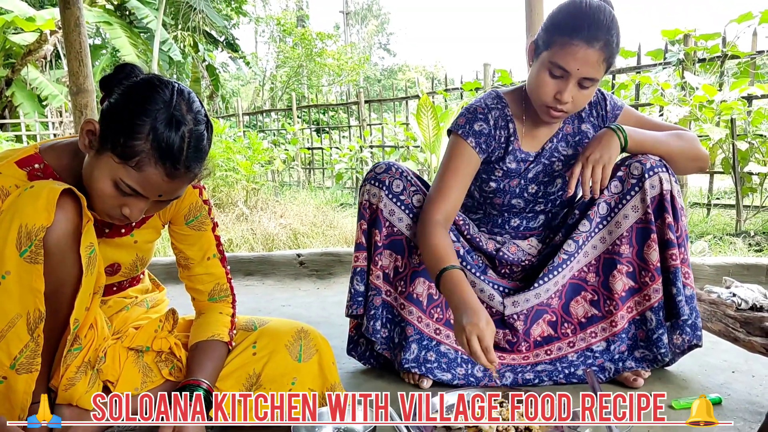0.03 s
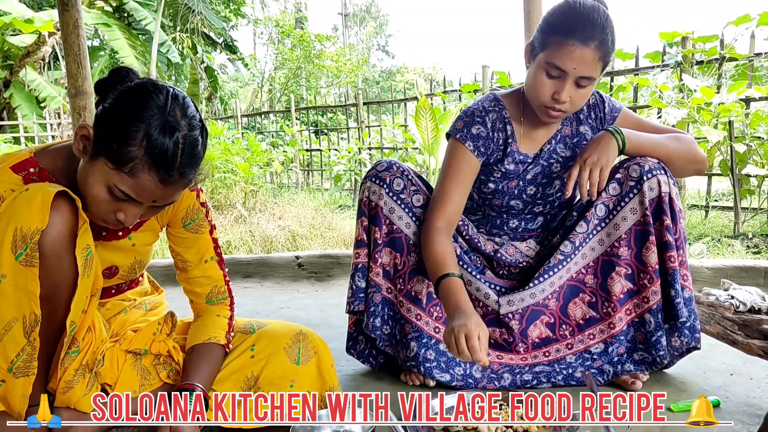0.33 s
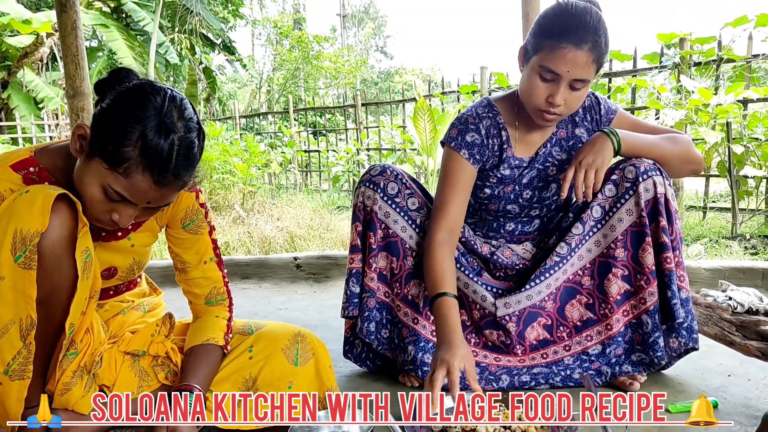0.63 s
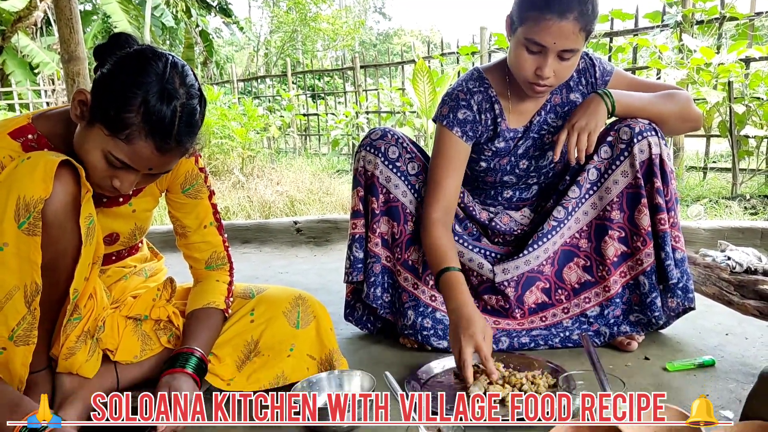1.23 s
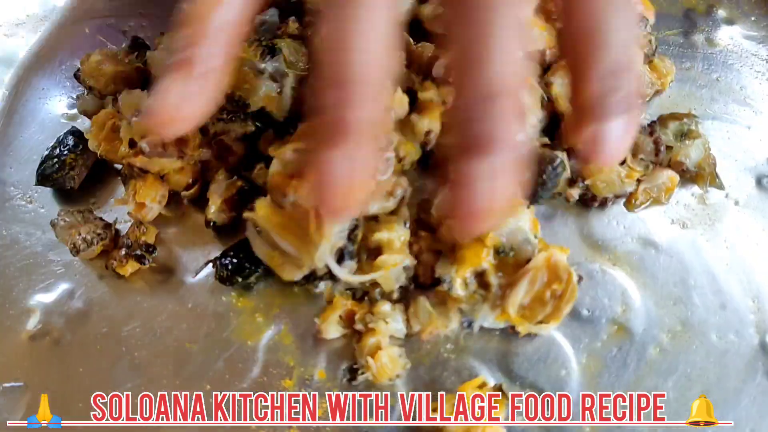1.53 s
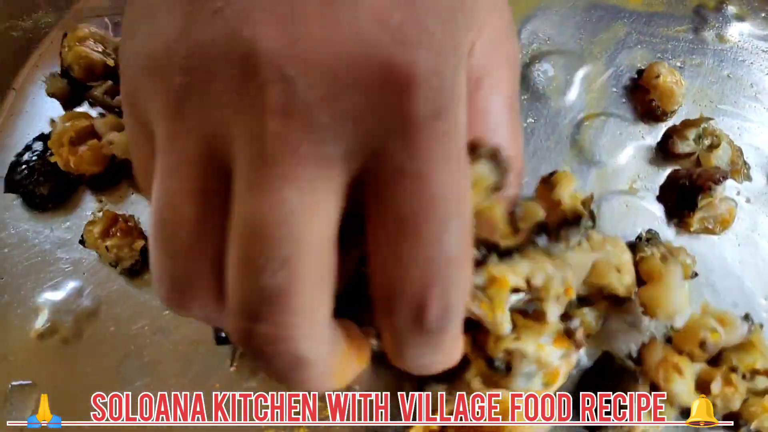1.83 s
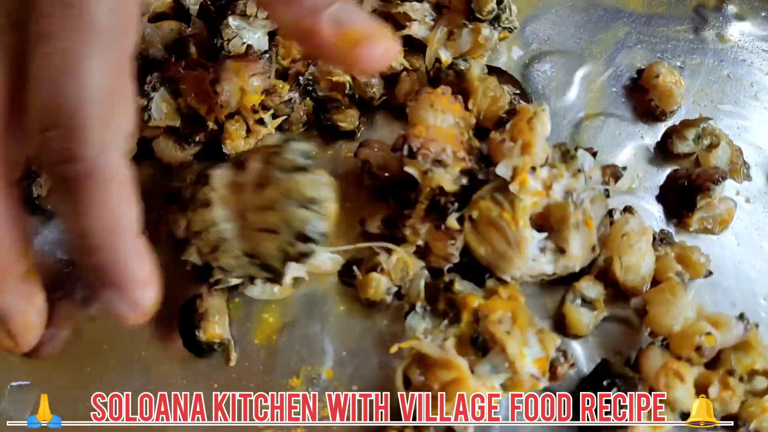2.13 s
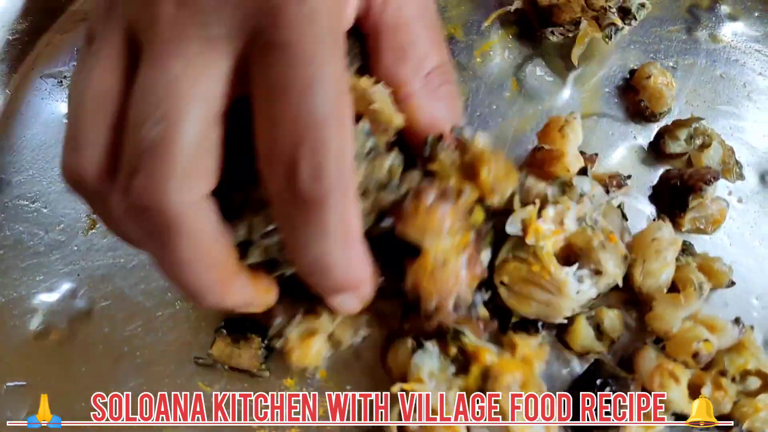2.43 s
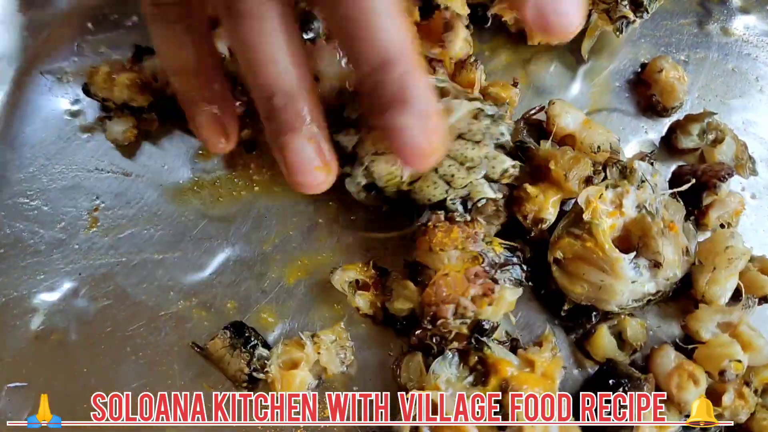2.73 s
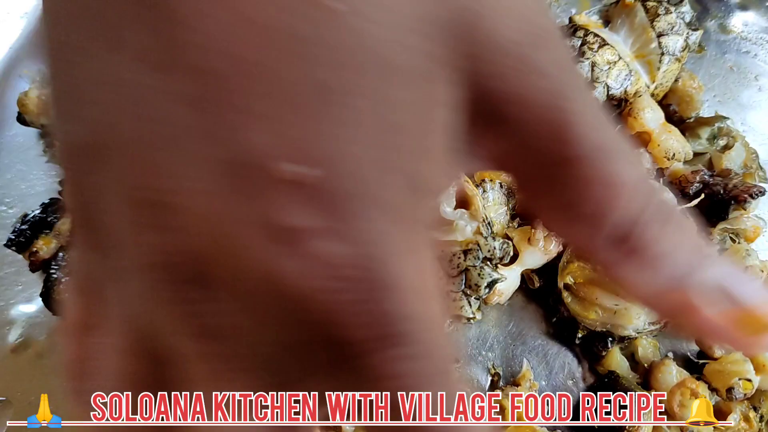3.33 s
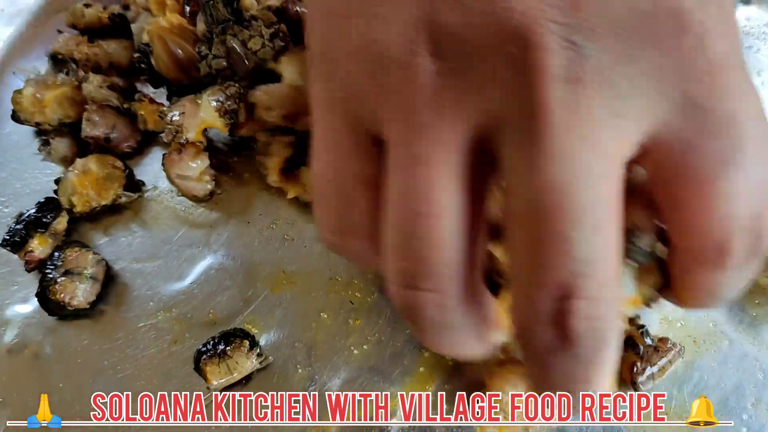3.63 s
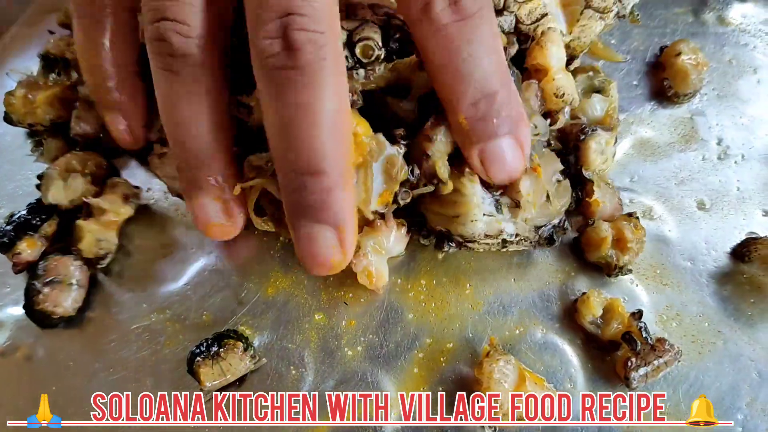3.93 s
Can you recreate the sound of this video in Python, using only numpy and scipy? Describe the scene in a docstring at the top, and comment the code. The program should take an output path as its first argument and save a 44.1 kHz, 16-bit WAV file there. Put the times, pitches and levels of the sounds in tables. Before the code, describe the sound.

Shell pieces scrape, rustle and knock on a steel plate as a hand turns them.

```python
"""A hand sweeps and turns spiced crab pieces on a steel plate, close by, in a quiet yard.
First a small bird chirps far away and a thin hiss swells and fades, while faint strokes begin: stick-slip
friction of shell on metal, exciting the plate's drifting modes. From about 1.4 s the strokes grow loud;
pieces snap, rasp, screech and knock, hardest at 2.4 s. Then bangles on the wrist collide most often,
ringing in their high modes, and the sweeping goes on to a last sharp knock at 3.9 s."""
import sys
import numpy as np
from scipy import signal
from scipy.fft import rfft, irfft
from scipy.io import wavfile
from scipy.ndimage import uniform_filter1d

SR = 44100
rng = np.random.default_rng(int(sys.argv[2]) if len(sys.argv) > 2 else 0)


def int16_out(signal):
    """Quantize to a 16-bit WAV file."""
    q = np.round(np.clip(np.atleast_2d(signal).T, -1, 1) * 32767)
    wavfile.write(sys.argv[1], SR, q.astype(np.int16))


N = 176400

# strokes of the hand: t/s, rubbing level/dB, rustle level/dB
STROKE_LEVELS = [(0.0, -66, -58.5), (0.114, -68, -63), (0.389, -69, -57), (0.682, -77, -55),
                 (0.748, -67, -45), (0.814, -82, -54.5), (0.83, -72, -51), (0.956, -52.5, -44),
                 (1.07, -59, -52.5), (1.088, -57, -42.5), (1.153, -45, -40.5), (1.189, -53, -44.5),
                 (1.303, -65, -52.5), (1.357, -57.5, -52.5), (1.411, -42.5, -42.5), (1.472, -66, -48),
                 (1.488, -48, -40), (1.514, -36, -32.5), (1.648, -43, -37.5), (1.69, -36.5, -33),
                 (1.768, -33.5, -31.5), (1.816, -36, -33.5), (1.879, -33, -28.5), (2.025, -41, -43),
                 (2.085, -45.5, -46), (2.132, -39.5, -54), (2.175, -63, -56), (2.205, -53, -54),
                 (2.217, -62, -53), (2.249, -35, -35), (2.278, -39.5, -25), (2.295, -29.5, -23),
                 (2.355, -32.5, -33.5), (2.455, -31, -28.5), (2.546, -39.5, -44), (2.56, -36.5, -37.5),
                 (2.614, -37, -31.5), (2.723, -39.5, -38.5), (2.746, -51, -45.5), (2.818, -47, -36),
                 (2.889, -40.5, -36.5), (2.901, -43.5, -37), (2.923, -32, -28), (2.973, -31.5, -27.5),
                 (3.105, -36.5, -34), (3.171, -38.5, -37.5), (3.213, -45, -49.5), (3.254, -51, -44.5),
                 (3.297, -74, -57), (3.433, -60, -50), (3.471, -45.5, -34.5), (3.537, -32.5, -32.5),
                 (3.593, -43, -38), (3.613, -34.5, -30), (3.632, -36, -31), (3.655, -40, -27.5),
                 (3.677, -44, -33.5), (3.694, -32, -32.5), (3.761, -48, -45), (3.781, -47, -46),
                 (3.817, -42, -49.5), (3.919, -52.5, -43), (3.961, -35.5, -44), (3.985, -46, -49)]
# spectra of shell on steel and of shell on shell: f/Hz, level/dB
RUB_SPECTRUM = [(100, 1.5), (350, -23), (700, -2.5), (930, 9), (1250, -5.5), (1700, -4.5), (2200, -0.5),
                (2900, -4.5), (4200, -3.5), (7000, -20), (15000, -72)]
RUSTLE_SPECTRUM = [(300, -47.5), (2000, -1.5), (3400, -13.5), (5500, -1.5), (7300, 7.5), (8600, 4.5),
                   (10300, -5), (12000, -7), (14200, -9), (16000, -60)]
def rubbing(t):
    """Stick-slip friction: dense slips of shell on steel and on shell merge into noise at each stroke."""
    when, rub_db, rustle_db = np.array(STROKE_LEVELS).T
    grit = slips(per_s=3500, spread_db=1, decay_s=0.00073) * undb(3 * walk(60))
    rub = undb(-7.5) * unit(colour(grit, RUB_SPECTRUM)) + undb(-4.5) * unit(plate(grit))
    fine_slips = slips(per_s=4800, spread_db=6, decay_s=0.0019) + grit * .5
    rustle = unit(colour(shimmer(fine_slips), RUSTLE_SPECTRUM))
    finger_drag = unit(resonate(noise(N), hz=156, t60=0.043))
    crunch = shell_bits(per_s=340, low_hz=1077, high_hz=2696, cycles=6.7, spread_db=4)
    ticks = shell_bits(per_s=640, low_hz=5610, high_hz=12000, cycles=28, spread_db=3.5)
    rub = rub + undb(-19) * finger_drag + undb(-8.5) * crunch
    rustle = rustle + undb(-10) * ticks
    return rub * undb(np.interp(t, when, rub_db)) + rustle * undb(np.interp(t, when, rustle_db))


def slips(per_s, spread_db, decay_s):
    """Shot noise: slips of unequal size come at random times, and their decaying energies add."""
    onsets = rng.random(N) < per_s / SR
    sizes = onsets * undb(spread_db * np.minimum(rng.exponential(size=N), 5))
    energy = signal.lfilter([1], [1, -np.exp(-2 / (decay_s * SR))], sizes ** 2 + 1e-12)
    return unit(np.sqrt(energy) * noise(N))


# modes of the loaded plate: f/Hz, level/dB, T60/s
PLATE_MODES = [(864, -19.5, 0.037), (905.6, 1, 0.065), (974, -1, 0.041), (1316, -3.5, 0.052),
               (1594, 3.5, 0.048), (2047, 2.5, 0.04), (2195, -2.5, 0.075)]
def plate(x, drift=0.033, swell_db=4.5):
    """Forced vibration: moving fingers load the plate, so each mode drifts in frequency and strength."""
    out = 0
    for hz, db, t60 in PLATE_MODES:
        drive = x * undb(db + swell_db * np.clip(walk(30), -2, 2))
        out = out + resonate(drive, hz * (1 + drift * walk(14)), t60)
    return out


def shimmer(x, decay_s=0.0082):
    """High modal density: the plate's countless weak modes give each slip a short noisy tail."""
    t = np.arange(SR // 15) / SR
    tail = noise(len(t)) * np.exp(-t / decay_s)
    tail /= np.sqrt(np.sum(tail ** 2) / 2)
    return x + undb(13) * signal.fftconvolve(x, tail, axes=1)[:, :N]


def shell_bits(per_s, low_hz, high_hz, cycles, spread_db):
    """Damped free vibration: hollow bits of shell collide, each ringing at its natural frequency."""
    out, t = np.zeros((2, N)), np.arange(SR // 40) / SR
    for when, pitch, size, side, turn in rng.random((int(per_s * N / SR), 5)):
        hz = low_hz * (high_hz / low_hz) ** pitch
        gain = undb(-spread_db * np.log(max(size, .015))) * np.sqrt([[side], [1 - side]])
        port_phase = np.array([[0], [(turn - .5) * min(hz / 500, 2 * np.pi)]])
        envelope = np.exp(-t * hz / cycles) * (1 - np.exp(-t * hz))
        add(out, when * N / SR, gain * np.sin(2 * np.pi * hz * t + port_phase) * envelope)
    return unit(out)


# shell points skidding on steel: peak t/s, half-width/s, level/dB
SCREECH_SWELLS = [(1.44, 0.0053, -37), (1.531, 0.015, -25), (1.546, 0.0039, -21.5), (1.568, 0.0086, -19),
                  (1.878, 0.0032, -23), (2.779, 0.012, -31), (2.931, 0.017, -24), (2.977, 0.021, -28),
                  (3.322, 0.0097, -34), (3.658, 0.0063, -30), (3.903, 0.0093, -43)]
# spectrum of a hard contact on steel: f/Hz, level/dB
SCREECH_SPECTRUM = [(500, -28), (4000, -24.5), (6500, 0.5), (8600, 4), (11000, 6), (12800, 1), (14500, -9)]
# high modes of the steel: f/Hz, level/dB, T60/s
STEEL_MODES = [(5700, -12, .04), (7140, 25, 0.057), (9400, 7, 0.021), (8170, -24, .04), (9940, 2, .05),
               (9460, -14, .05), (10130, -19, .05), (10200, -22, 0.034), (10800, -17, .05),
               (11200, -4, .05), (12400, 4, 0.095), (12800, -14, .05), (13620, -9, .05)]
def screeches(t):
    """Frictional excitation: a hard point judders over the metal and rings its high modes."""
    envelope = sum(swell(t, *row) for row in SCREECH_SWELLS)
    judder = envelope * unit(colour(slips(per_s=2200, spread_db=0.5, decay_s=0.00016), SCREECH_SPECTRUM))
    return undb(0.5) * (judder + judder.std() * unit(ring(judder, STEEL_MODES)))


# hard drags of shell: peak t/s, half-width/s, level/dB, f/Hz
RASP_SWELLS = [(1.507, 0.013, -43, 1670), (1.57, 0.013, -39, 5900), (1.8, 0.013, -43, 5300),
               (1.875, .012, -38, 4100), (1.862, 0.019, -37, 1700), (2.33, 0.022, -29.5, 1750),
               (2.3, .025, -37, 5100), (2.9, 0.02, -32.5, 6100), (2.992, 0.025, -37, 6700),
               (2.4, 0.027, -61, 4400), (3.698, 0.017, -31, 1840)]
def rasps(t, q=16):
    """Resonance driven by stick-slip: a dragged shell rings at its own unsteady frequency."""
    out, drag = 0, slips(per_s=1900, spread_db=4.5, decay_s=0.00017)
    wander = 1 + 0.01 * walk(50)
    for at, half, db, hz in RASP_SWELLS:
        ringing = resonate(drag, hz * wander, t60=np.log(1000) * q / (np.pi * hz))
        out = out + swell(t, at, half, db) * unit(ringing)
    return out


# pieces striking the plate: t/s, level/dB, left minus right/dB
KNOCK_IMPACTS = [(1.545, -27.5, 0), (1.621, -28, -4), (1.679, -27, -2), (1.768, -25, -4), (1.872, -25.5, 2),
                 (1.946, -27, -2), (2.029, -25.5, -1), (2.115, -37, 1), (2.3754, -7.5, 1.5),
                 (2.672, -27, 1), (2.991, -26, -1), (3.099, -21.5, 2.5), (3.159, -27.5, -3),
                 (3.232, -25, 2), (3.268, -32.5, -3), (3.446, -31.5, -1), (3.487, -33.5, 2),
                 (3.541, -25.5, -4), (3.61, -27, -2), (3.778, -32, -1), (3.9342, -13.5, 0.5)]
# spectrum of their rattle: f/Hz, level/dB
RATTLE_SPECTRUM = [(60, -72.5), (180, -19), (450, -9.5), (650, -6), (900, 5.5), (1300, -3.5), (2000, -2.5),
                   (3000, -23.5), (6000, -21), (15000, -69)]
def knocks(dent_hz=940, dent_s=0.0045, rattle_s=0.0061):
    """Impulse response: a dropped piece flexes the damped plate, rings its modes and rattles briefly."""
    out, t = np.zeros((2, N)), np.arange(SR // 6) / SR
    impulse = np.array([t == 0, t == 0], float)
    ringing = ring(impulse, PLATE_MODES)
    dent = np.sin(2 * np.pi * dent_hz * t) * np.exp(-t / dent_s)
    blow = undb(-2.5) * dent + undb(-22) * ringing / abs(ringing).max()
    for at, db, pan_db in KNOCK_IMPACTS:
        rattle = unit(colour(noise(len(t)), RATTLE_SPECTRUM)) * np.exp(-t / rattle_s)
        gain = undb(db + np.array([[pan_db], [-pan_db]]) / 2)
        add(out, at, gain * (blow + undb(-5.5) * rattle))
    return out


# shell edges snapping: t/s, level/dB, shell resonance f/Hz
SHELL_SNAPS = [(.737, -34.5, 9000), (1.0815, -24.5, 2360), (1.408, -27, 8400), (1.438, -21.5, 8300),
               (1.496, -26.5, 8900), (2, -34, 8500), (2.029, -31.5, 5000), (2.044, -40, 8450),
               (2.067, -33.5, 10200), (2.117, -28.5, 3500), (2.127, -29.5, 6460), (2.159, -35.5, 8850),
               (2.3768, -19.5, 1880), (2.712, -16.5, 2050), (3.033, -17.5, 9000), (3.099, -10.5, 8870),
               (3.233, -24, 3630), (3.445, -34.5, 9300), (3.796, -32, 9250), (3.875, -25.5, 3930),
               (3.882, -23, 2400), (3.888, -21.5, 4020), (3.9349, -17.5, 12700)]
# spectrum of the crack: f/Hz, level/dB
CRACK_SPECTRUM = [(300, -7.5), (1000, -20.5), (3000, -12), (6000, 8.5), (9000, 10.5), (11500, -3.5),
                  (15000, -4)]
def snaps(rise_s=0.0003, decay_s=0.0024, tail_s=0.012, q=19):
    """Release of elastic energy: thin shell flicks free with a crack coloured by its own resonance."""
    out, t = np.zeros((2, N)), np.arange(SR // 12) / SR
    envelope = (np.exp(-t / decay_s) + undb(-12) * np.exp(-t / tail_s)) * (1 - np.exp(-t / rise_s))
    for at, db, hz in SHELL_SNAPS:
        burst = noise(len(t))
        ringing = resonate(burst, hz, t60=np.log(1000) * q / (np.pi * hz))
        crack = unit(colour(burst, CRACK_SPECTRUM)) + undb(-8) * unit(ringing)
        add(out, at, undb(db - 2.5) * crack * envelope)
    return out


# bangles colliding: t/s, level/dB, favoured f/Hz
BANGLE_CLINKS = [(1.684, -26, 11200), (1.899, -41, 11900), (2.067, -33, 10400), (2.156, -39, 12300),
                 (2.602, -34, 12100), (2.617, -29, 12300), (2.743, -31.5, 11080), (2.77, -22.5, 9400),
                 (2.792, -21.5, 12000), (2.8065, -18, 11340), (2.85, -24, 12200), (2.864, -26.5, 10200),
                 (2.879, -27, 11500), (2.915, -18, 11600), (2.927, -11.5, 12100), (3.061, -32, 12000),
                 (3.071, -20.5, 12100), (3.311, -26, 12800), (3.337, -30, 12000), (3.347, -33, 9400),
                 (3.388, -33, 12000), (3.604, -19, 11830), (3.644, -22, 12200), (3.65, -21, 11650),
                 (3.655, -30, 10800), (3.89, -35, 12200), (3.962, -22.5, 12300), (3.9755, -23.5, 12400)]
# modes of the bangles: f/Hz, level/dB, T60/s
BANGLE_MODES = [(5100, -21, 0.12), (6560, 4, 0.11), (8170, -31, .04), (9400, -3.5, 0.09),
                (10450, -8, 0.059), (10700, -9, 0.077), (11420, -1, 0.1), (12080, 4, 0.073),
                (12110, -8, 0.089), (12870, 4, 0.053), (13300, -31, 0.044)]
def bangles(touches=3, bounce_s=0.014, bounce_db=-13.5, rise_s=0.00082, chatter_s=0.0018):
    """Inelastic rebound: bangles touch ever more weakly, each time with a different mix of modes."""
    out, t = np.zeros((2, N)), np.arange(SR // 6) / SR
    detune, scatter_db, focus_db, focus_width_hz = 0.0052, 3, 16, 450
    envelope = np.exp(-t / chatter_s) * (1 - np.exp(-t / rise_s)) ** 2
    for at, db, favoured_hz in BANGLE_CLINKS:
        for bounce in range(touches):
            touch = rng.standard_normal((2, len(t))) * envelope
            modes = []
            for hz, mode_db, t60 in BANGLE_MODES:
                mode_db += focus_db * np.exp(-((hz - favoured_hz) / focus_width_hz) ** 2)
                modes.append((hz * rng.normal(1, detune), rng.normal(mode_db, scatter_db), t60))
            ringing = ring(touch, modes)
            clink = ringing / abs(ringing).max() + undb(-18) * colour(touch, SCREECH_SPECTRUM)
            add(out, at, undb(db + 3.5 + bounce * bounce_db) * clink)
            at += bounce_s * (.5 + rng.random())
    return out


# heel of the hand on the plate, and at 2.376 s the low thud of the hardest knock: peak t/s, half-width/s,
# level/dB
PRESS_SWELLS = [(1.572, 0.018, -51), (2.108, 0.081, -49), (2.376, 0.0033, -31), (2.947, 0.015, -37)]
# spectrum of the bump: f/Hz, level/dB
PRESS_SPECTRUM = [(40, -6), (130, 4.5), (300, -4), (450, -2.5), (900, -38), (4000, -77)]
def presses(t):
    """Compliant contact: the soft hand bears down, and the hardest knock thuds, mainly in low frequencies."""
    return sum(swell(t, *row) for row in PRESS_SWELLS) * unit(colour(noise(N), PRESS_SPECTRUM))


# spectrum of the yard: f/Hz, level/dB
YARD_SPECTRUM = [(25, -6), (60, 2), (140, -7.5), (280, -16.5), (420, -17.5), (600, -28), (1000, -33),
                 (1700, -42), (2400, -34.5), (3300, -45), (6000, -37), (9000, -40), (14000, -41)]
def yard():
    """Ambient noise: low outdoor rumble and faint hiss, only partly coherent between the ports."""
    air = noise(N) + undb(-7) * rng.standard_normal((2, N))
    return undb(-49 + 0.057 * walk(4.9)) * unit(colour(air, YARD_SPECTRUM))


# chirps: t/s, duration/s, start f/Hz, end f/Hz, level/dB
BIRD_CHIRPS = [(-.01, 0.041, 11300, 11100, -64), (0.056, 0.092, 11060, 10200, -61)]
def bird(t):
    """Frequency modulation: a distant bird's thin tone wavers and glides downward."""
    out, waver = 0, 1 + 0.0046 * walk(195)
    for at, length, start_hz, end_hz, db in BIRD_CHIRPS:
        progress = np.clip((t - at) / length, 0, 1)
        hz = (start_hz + (end_hz - start_hz) * progress ** 2) * waver
        out = out + undb(db) * np.sin(np.pi * progress) * np.sin(2 * np.pi * np.cumsum(hz) / SR)
    return out


# spectrum of the far hiss: f/Hz, level/dB
HISS_SPECTRUM = [(3000, -45), (5200, -10), (5900, 6), (6400, 8), (7200, -17), (11000, -43)]
def far_hiss(t):
    """Narrow-band noise: a soft hiss swells and fades far off."""
    return swell(t, at=0.7, half_s=0.11, db=-53) * unit(colour(noise(N), HISS_SPECTRUM))


def undb(db):
    """Amplitude ratio of a level in decibels."""
    return 10 ** (np.asarray(db) / 20)


def unit(x):
    """Normalisation to rms 1."""
    return x / np.sqrt(np.mean(x ** 2))


def swell(t, at, half_s, db):
    """Gaussian envelope, down to 1/e at half_s either side of its peak."""
    return undb(db) * np.exp(-((t - at) / half_s) ** 2)


def colour(x, points, size=4096):
    """Minimum-phase filter through (f/Hz, level/dB) points, by folding the cepstrum."""
    hz, db = np.array(points, float).T
    log_hz = np.log(np.arange(size // 2 + 1) * SR / size + 1)
    cepstrum = irfft(np.interp(log_hz, np.log(hz), db) * np.log(10) / 20)
    cepstrum[1:size // 2] *= 2
    cepstrum[size // 2 + 1:] = 0
    response = irfft(np.exp(rfft(cepstrum)))
    return signal.fftconvolve(x, response[None], axes=1)[:, :x.shape[1]]


def ring(x, modes):
    """Modal superposition: convolution with damped sinusoids (f/Hz, level/dB, T60/s)."""
    t = np.arange(SR // 5) / SR
    response = sum(undb(db - 60 * t / t60) * np.sin(2 * np.pi * hz * t) for hz, db, t60 in modes)
    return signal.fftconvolve(x, response[None], axes=1)[:, :x.shape[1]]


def resonate(x, hz, t60):
    """Driven damped oscillator whose natural frequency may vary."""
    phasor = np.exp(2j * np.pi * np.cumsum(hz * np.ones(x.shape[1])) / SR)
    pole = np.exp(-np.log(1000) / (t60 * SR))
    return (phasor * signal.lfilter([1], [1, -pole], x / phasor)).imag


def noise(size, corner_hz=1920):
    """Spatial coherence: white noise at two ports, alike in the bass and unrelated in the treble."""
    mid, side = rfft(rng.standard_normal((2, size)))
    coherence = .85 / (1 + (np.fft.rfftfreq(size, 1 / SR) / corner_hz) ** 2)
    mid, side = mid * np.sqrt(1 + coherence), side * np.sqrt(1 - coherence)
    return irfft(np.array([mid + side, mid - side]), size) / np.sqrt(2)


def walk(per_s):
    """Smooth random modulation of rms 1."""
    step = int(SR / per_s)
    path = np.interp(np.arange(N) / step, np.arange(N // 50), rng.standard_normal(N // 50))
    return unit(uniform_filter1d(path, step // 2))


def add(out, start, sound):
    """Superposition of a sound from its start time."""
    i = max(int(start * SR), 0)
    out[:, i:i + sound.shape[1]] += sound[:, :max(N - i, 0)]


def scene(lag_s=0.00013):
    """Path difference: the plate lies slightly to the right, so its sound reaches the left port later."""
    t = np.arange(N) / SR
    left, right = rubbing(t) + screeches(t) + rasps(t) + knocks() + snaps() + bangles() + presses(t)
    return np.array([np.interp(t - lag_s, t, left), right]) + yard() + bird(t) + far_hiss(t)


# responses of the two microphone ports: f/Hz, level/dB
LEFT_RESPONSE = [(400, -3), (1000, 1.5), (2100, 2.5), (3200, 8), (5400, 2.5), (6300, -5), (7500, -9.5),
                 (8450, -2.5), (9400, 2.5), (10300, 9), (14000, 1.5)]
RIGHT_RESPONSE = [(400, -2), (1000, 1), (2100, -0.5), (3200, 6.5), (5400, 0.5), (6300, -4), (7500, -3),
                  (8450, 4.5), (9400, 5), (10300, 3), (14000, -2)]
def record(dry, cutoff_hz=14300):
    """Frequency response: each port colours the sound in its own way, and a low-pass cuts the top."""
    heard = np.vstack([colour(dry[:1], LEFT_RESPONSE), colour(dry[1:], RIGHT_RESPONSE)])
    return signal.sosfilt(signal.ellip(8, .2, 70, cutoff_hz, fs=SR, output="sos"), heard)


dry = scene()
out = record(dry)
int16_out(out)
```